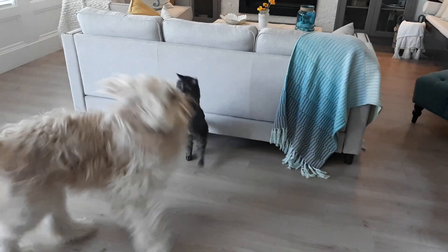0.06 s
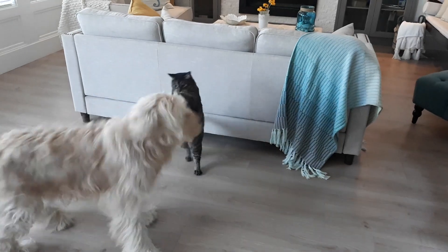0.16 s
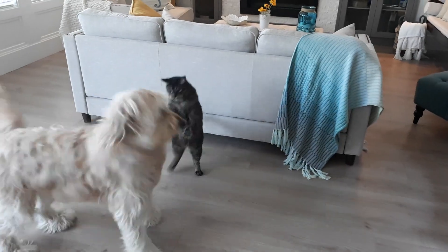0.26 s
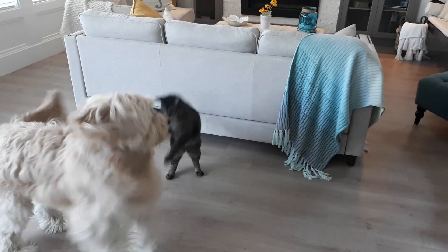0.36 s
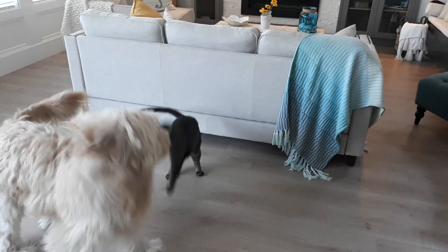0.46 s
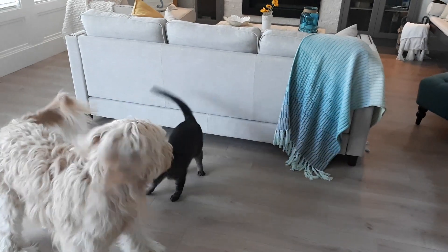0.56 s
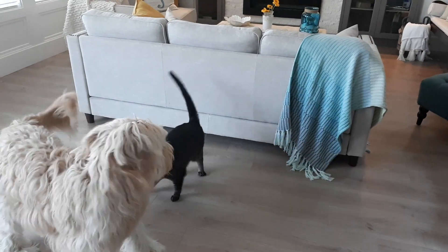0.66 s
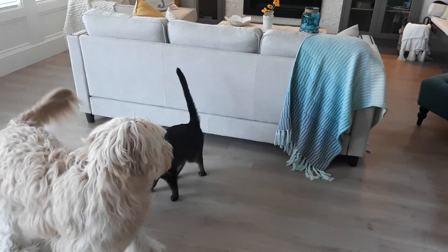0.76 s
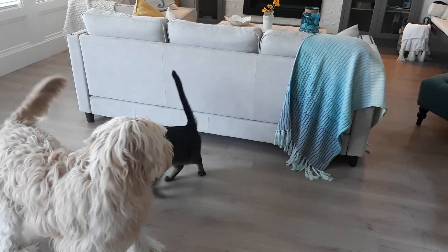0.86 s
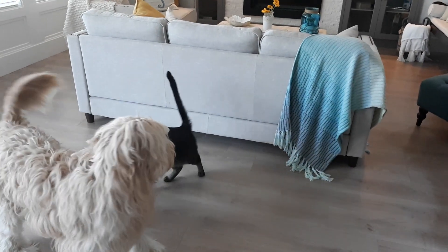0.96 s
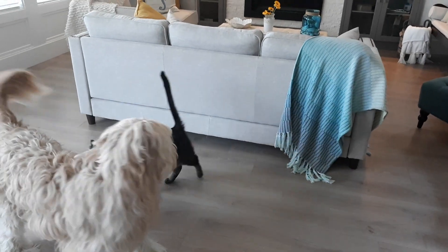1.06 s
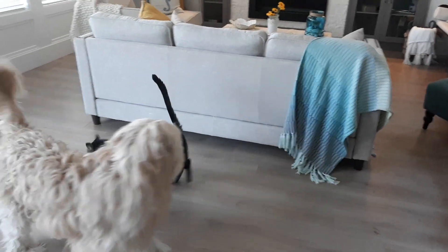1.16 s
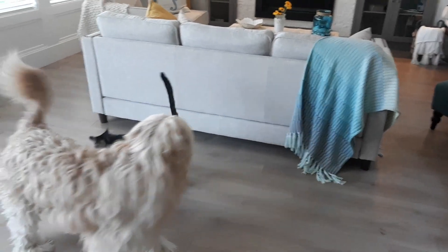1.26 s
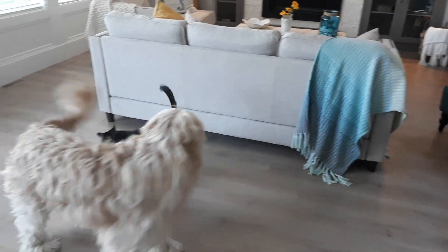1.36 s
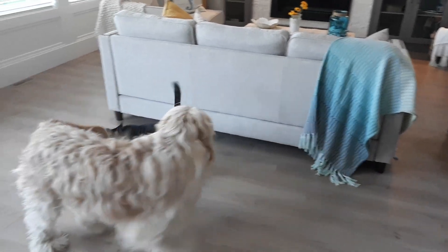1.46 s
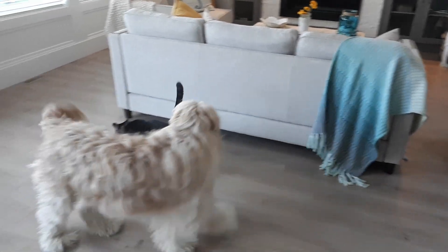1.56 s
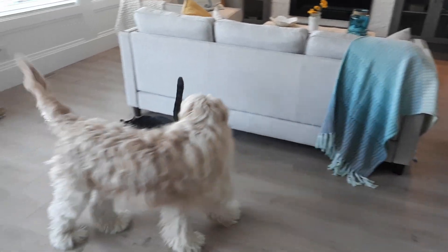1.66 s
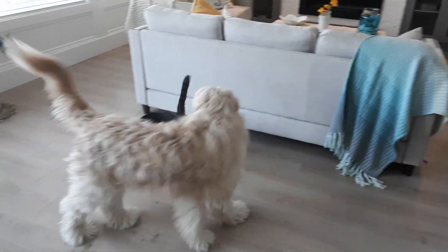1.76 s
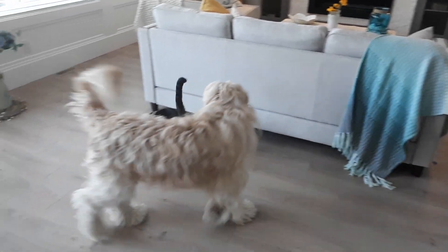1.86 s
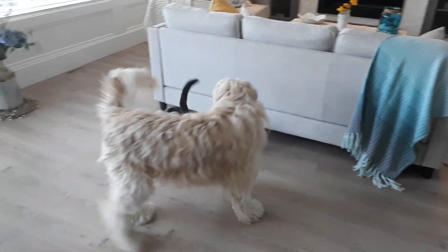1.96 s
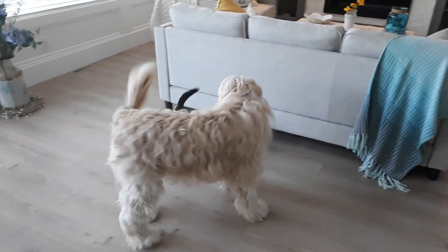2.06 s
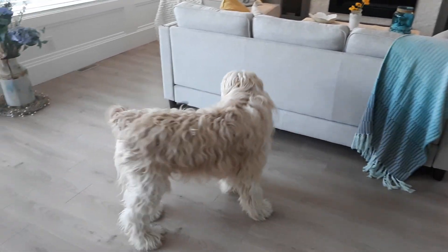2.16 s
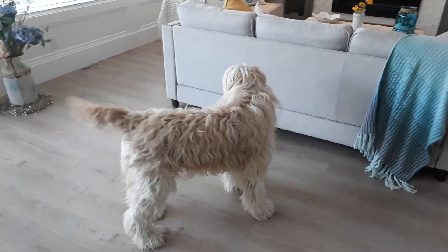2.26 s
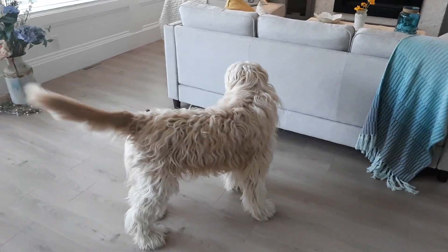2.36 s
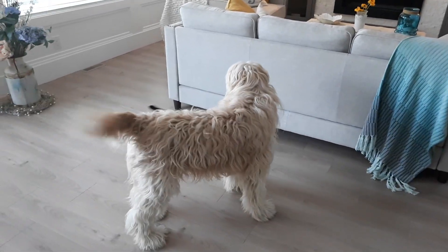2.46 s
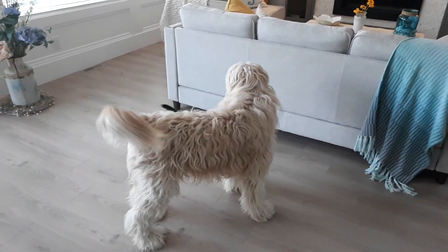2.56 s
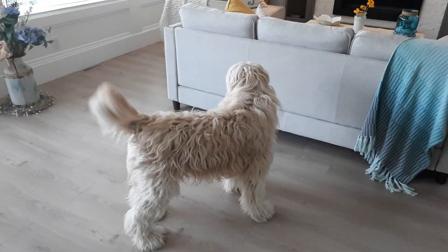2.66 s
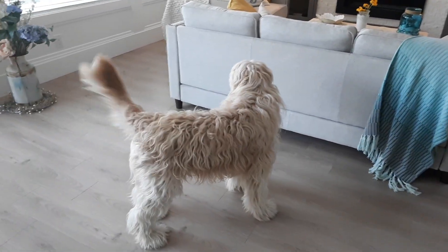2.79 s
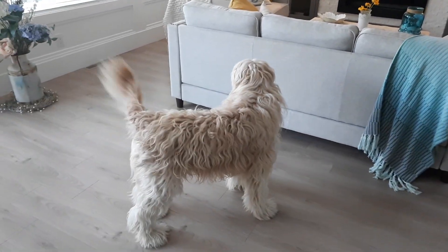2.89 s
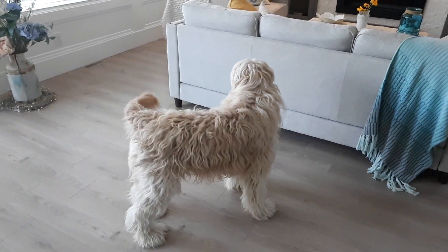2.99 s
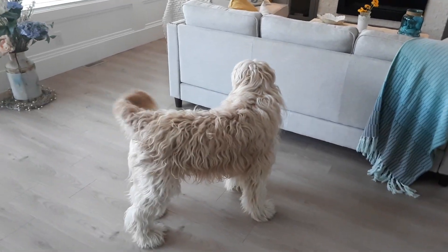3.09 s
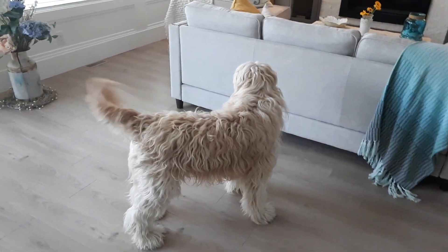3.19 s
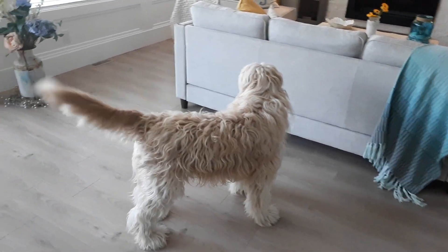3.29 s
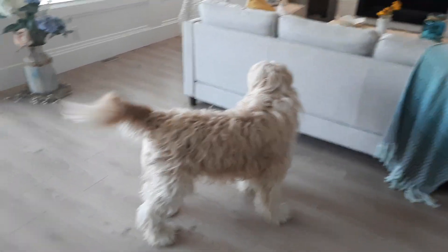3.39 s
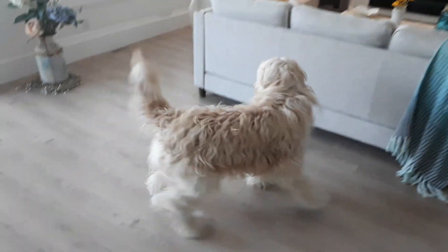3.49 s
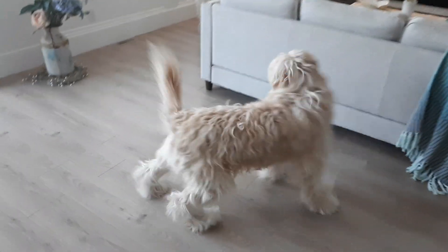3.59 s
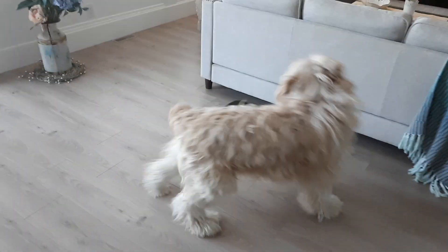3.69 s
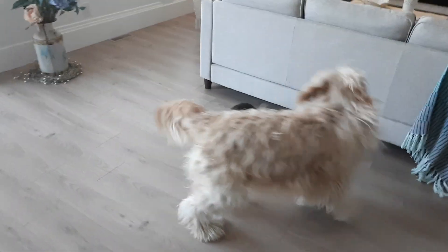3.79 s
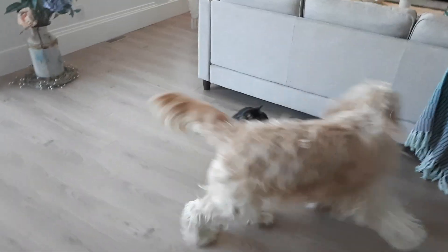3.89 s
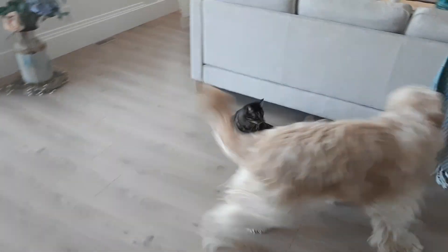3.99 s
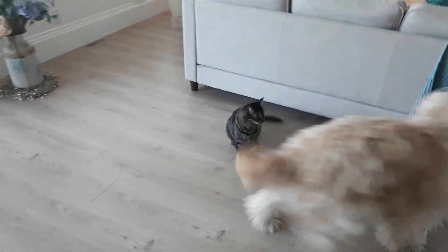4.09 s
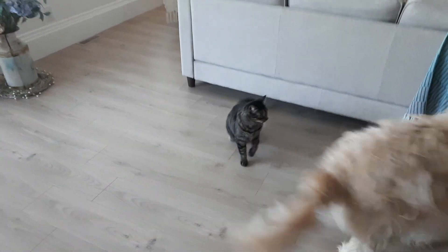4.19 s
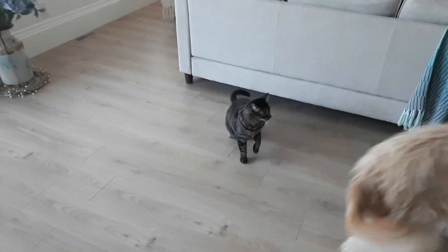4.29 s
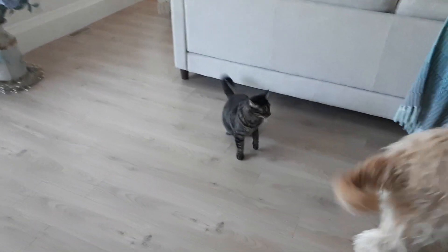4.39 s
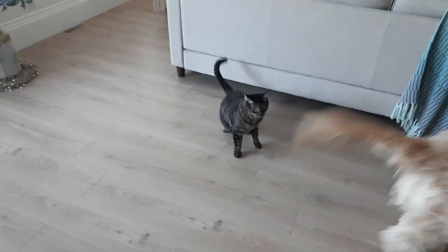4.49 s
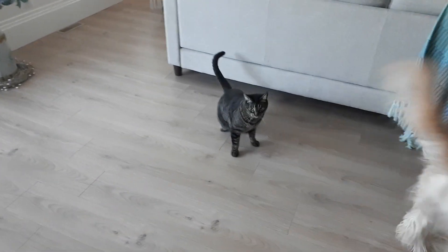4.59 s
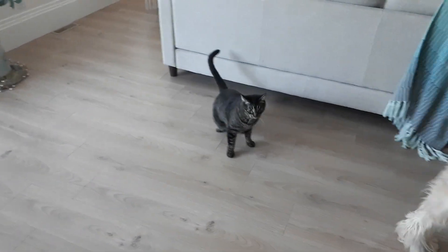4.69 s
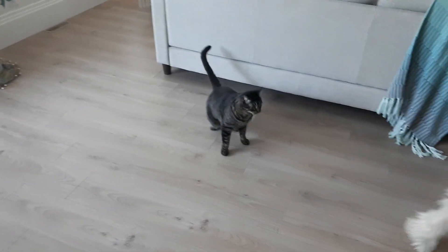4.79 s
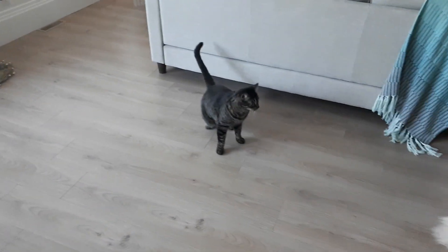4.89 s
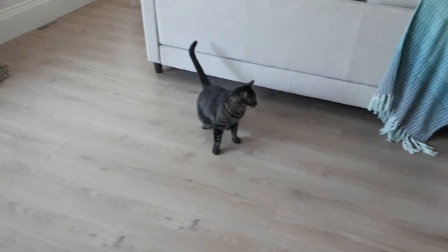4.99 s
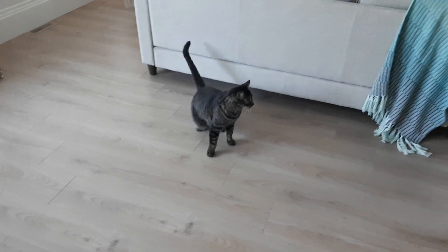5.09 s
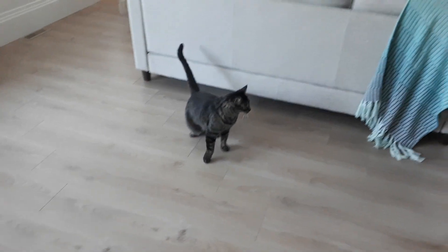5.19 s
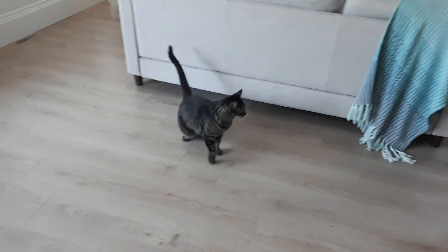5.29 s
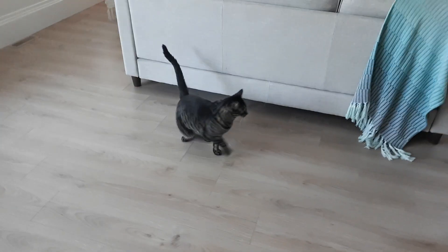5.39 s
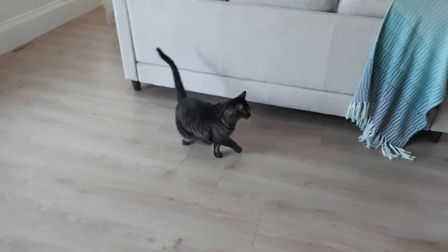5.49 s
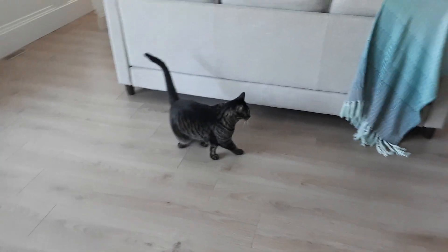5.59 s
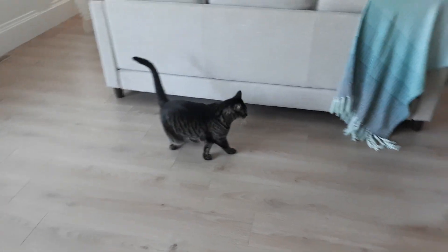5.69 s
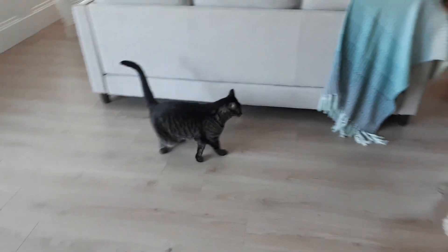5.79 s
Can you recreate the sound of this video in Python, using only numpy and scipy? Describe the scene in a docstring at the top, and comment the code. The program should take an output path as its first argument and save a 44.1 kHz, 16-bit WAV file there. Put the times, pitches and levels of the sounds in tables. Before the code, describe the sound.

Claws rattle in quick clusters on wooden boards with soft thuds underneath, and a faint high whine slips in early. Then near silence over low air noise, one small step and thump around two seconds. Later a grainy scrape starts a louder burst of clicks that moves right and fades to sparse taps. Lively room, microphones a metre or two away.

```python
"""A large dog pounces at a silent cat, stands, then scrambles off to the right on a plank floor in a live living room.
About a metre or two from the microphones, claws click one after another: ticks, chatter and ringing wood.
Pads and knocks push the boards into low thumps, paws skid as grainy noise, one thin whine sounds early on.
Sparse, thickening reflections follow, stronger for claws farther away, over air noise and a faint fan hum."""
import sys
import numpy as np
from scipy import signal
from scipy.fft import rfft, irfft
from scipy.io import wavfile
from scipy.ndimage import uniform_filter1d

SR = 44100
rng = np.random.default_rng(int(sys.argv[2]) if len(sys.argv) > 2 else 0)


def output_pcm(signal):
    """Save a mono or channel-first signal as 16-bit PCM at the path in sys.argv[1].

    Samples are clipped to [-1, 1] before scaling.
    """
    pcm = np.clip(np.atleast_2d(signal).T, -1, 1) * 32767
    wavfile.write(sys.argv[1], SR, np.round(pcm).astype(np.int16))


N = 257984  # length in samples

# sound straight from the claw tip to the microphones, relative to the plank: freq_hz, gain_db
CLAW_TIP_COLOUR = [(100, -3.5), (1200, 0.5), (2500, 2.5), (4500, -1), (8000, 0.5), (11000, 4),
                   (16000, -10.5)]


def claws(ring_db=-12, ring_ms=5, stray_db=-13, stray_ms=25, strays_per_s=250, spread=0.77, size=4096, count=5):
    """Each claw gives a sharp tick and a brief chatter; the plank rings and neighbouring claws graze it."""
    direct, spots = np.zeros((2, N)), np.zeros((count, N))
    hz = bins(size)
    ms = np.arange(size) / SR * 10 ** 3
    modes_db = plank_modes(len(PAW_LANDINGS), size)
    tick = 0.5 * evened(1.0 * (ms == 0))
    for k, (step, s, db, pitch_hz, chatter_ms, room_db, snap_db) in enumerate(claw_touches()):
        # the level is the rms of a click whose energy is packed into 1 ms
        height = amp(db) * np.sqrt(SR / 10 ** 3 / size)
        # the plank radiates differently towards each ear
        grit = rng.standard_normal((3, size))
        grit = grit[0] + spread * grit[1:]
        chatter = evened(grit * np.exp(-ms / chatter_ms))
        ring = amp(ring_db) * evened(grit[:, ::-1] * np.exp(-ms / ring_ms))
        grazes = rng.random(size) < strays_per_s / SR
        strays = amp(stray_db) * evened(grit * grazes * np.exp(-ms / stray_ms))
        force = tick + chatter + ring + strays

        colour_db = contact(hz, pitch_hz, snap_db - shade(s), lift_db=6.5, octaves=0.27) + modes_db[step]
        click = irfft(rfft(force) * causal(colour_db + read(CLAW_TIP_COLOUR, hz)))
        add(direct, s, placed(height * evened(click), s))

        echo_db = contact(hz, pitch_hz, snap_db, lift_db=3.5, octaves=0.54) + modes_db[step]
        add(spots[k % count], s, height * amp(room_db) * evened(irfft(causal(echo_db))))
    # successive claws land on different spots, each with its own reflections
    return direct, sum(room(spot) for spot in spots)


# a paw lands, claws first: start_s, claw_level_db, pitch_hz, snap_db (top octave), chatter_ms (decay),
# claws (how many touch), gap_ms (between touches)
PAW_LANDINGS = [(.001, -11.5, 5400, 1.5, 4, 2, 9.5), (0.1324, -18, 6760, 10, 2.4, 2, 4),
                (.174, -19, 6240, -7, 2.2, 1, 0), (0.338, -31.5, 4500, 0, 5.2, 1, 0),
                (0.4101, -17, 4870, 3.5, 1.3, 4, 5), (0.443, -23, 8200, 25, 0.36, 1, -3),
                (0.4672, -19.5, 5100, -14, 6.2, 1, 0), (1.682, -35.5, 3240, -12, 4.1, 1, 0),
                (2.046, -20.5, 6700, -0.5, 2.7, 2, 10), (3.6, -13, 5600, 3.5, 3.4, 1, -2),
                (3.7827, -14.5, 6540, -0.5, 0.13, 3, 6), (3.898, -16, 4540, 8.5, 1.7, 2, 5.5),
                (3.9625, -9, 6760, 12.5, 3.5, 1, 0), (3.9682, -13.5, 4400, -23, 5.5, 1, 3),
                (4.1917, -17, 5270, 12, 0.42, 1, 0), (4.2074, -15.5, 5750, 3.5, .8, 2, 8),
                (4.3549, -22, 7500, 9.5, .6, 2, 6), (4.4527, -16, 5060, 9, 0.48, 1, 0),
                (4.464, -37, 6460, 26, 0.44, 2, 9), (4.7129, -33.5, 5500, 5, 0.44, 1, -9.5),
                (4.7806, -34.5, 5050, -7.5, 1.4, 2, 10), (4.9136, -42, 4250, -8, 1.4, 2, 3.5),
                (5.1305, -40, 4580, -18.5, 2, 1, -3.5), (5.1493, -26.5, 4900, 2, 0.35, 1, -5.5),
                (5.503, -48, 4040, -16.5, 9, 1, 1), (5.6523, -27, 5600, 8, 2.7, 1, -14)]
# a claw's room send at 1 m; dragging, low-pitched contacts stir the room more
CLAW_ROOM_DB, CLAW_ROOM_DB_PER_MS = -6, 0.76
CLAW_ROOM_HZ, CLAW_ROOM_DB_PER_OCTAVE = 5600, -5.5
ROLL_DB = -1  # level of a paw's last claw relative to its first


def claw_touches():
    """The claws of a paw touch one after another: step, s, dB, pitch Hz, chatter ms, room send dB, snap dB."""
    for step, (s, db, pitch_hz, snap_db, chatter_ms, count, gap_ms) in enumerate(PAW_LANDINGS):
        _, metres = whereabouts(s)
        room_db = CLAW_ROOM_DB + 20 * np.log10(metres) + CLAW_ROOM_DB_PER_MS * chatter_ms
        room_db += CLAW_ROOM_DB_PER_OCTAVE * np.log2(pitch_hz / CLAW_ROOM_HZ)
        roll_db = np.linspace(0, ROLL_DB, round(count))
        for k, extra_db in enumerate(roll_db - roll_db.mean()):
            touch_s = s + k * gap_ms / 10 ** 3
            yield step, touch_s, db + extra_db, pitch_hz, chatter_ms, room_db, snap_db


# what a claw on a plank radiates: freq_hz, gain_db
PLANK_COLOUR = [(100, -22), (400, -15), (700, -15), (1150, -7), (1600, -6), (2600, 1), (4800, 2),
                (5600, -2), (7900, -1), (9300, -12), (12500, -15.5), (16000, -29)]


def contact(hz, centre_hz, snap_db, lift_db, octaves, snap_hz=9200):
    """The plank's spectrum in dB, lifted around the contact's pitch; a sharp tip adds top, a dull one loses it."""
    top = 1 - 1 / (1 + (hz / snap_hz) ** 10)
    return read(PLANK_COLOUR, hz) + lift_db * lifted(hz, centre_hz, octaves) + snap_db * top


def plank_modes(steps, size, depth_db=2.1, width_hz=130):
    """Every step lands on another plank, with its own peaks and dips: dB per step and frequency."""
    width_bins = round(width_hz * size / SR)
    bumps = rng.standard_normal((steps, size // 2 + 1))
    smooth = uniform_filter1d(uniform_filter1d(bumps, width_bins), width_bins)
    return depth_db * evened(smooth)


# the dog's place seen from the microphones: start_s, bearing (-1 left to 1 right), distance_m
DOG_PATH = [(0, -0.33, 1.46), (.45, -0.26, 1.23), (1.7, 0.48, 0.75), (2.05, -0.17, 1.39), (3.6, 0.029, 1.2),
            (4.25, 0.95, 1.06), (4.5, 0.93, 1.86), (5.7, 1, 1.64)]


def whereabouts(s):
    """The dog's bearing and distance at time s, moving evenly between the listed places, never under 0.5 m."""
    times, bearing, metres = np.transpose(DOG_PATH)
    return np.interp(s, times, bearing), max(np.interp(s, times, metres), 0.5)


SHADE_DB_PER_M, SHADE_FROM_M = 20, 1.3


def shade(s):
    """Top-octave loss in dB: farther off, the dog's own body hides its claws from the microphones."""
    _, metres = whereabouts(s)
    return SHADE_DB_PER_M * max(metres - SHADE_FROM_M, 0)


PAN_DB, LAG_MS = 3.5, 0.27  # at full right, the left side is this much weaker and later


def placed(pair, s):
    """Gives a sound the level difference and delay of the dog's bearing: the far side is weaker and later."""
    bearing, _ = whereabouts(s)
    pan_db, lag_ms = -PAN_DB * bearing, LAG_MS * bearing
    delay_s = np.maximum([[lag_ms], [-lag_ms]], 0) / 10 ** 3
    size = pair.shape[1]
    delayed = irfft(rfft(pair) * np.exp(-2j * np.pi * bins(size) * delay_s), size)
    return delayed * amp([[pan_db / 2], [-pan_db / 2]])


# how the floor under a pad booms into the room: freq_hz, gain_db
FLOOR_BOOM = [(30, -18.5), (70, -4.5), (130, -5), (200, 6), (320, -4), (450, -7), (650, -32.5),
              (1500, -45.5), (16000, -95)]
SWELL_CYCLES = 0.95  # a thump's envelope peaks after this many cycles of the board
# room send at the reference pitch; higher thumps carry better into the room
PAD_ROOM_DB, PAD_ROOM_HZ, PAD_ROOM_DB_PER_OCTAVE = -5, 220, 6.5


def pads(lift_db=6, octaves=0.68, size=8192):
    """A soft pad pushes the boards into a few low cycles; the whole floor booms into the room."""
    direct, send = np.zeros(N), np.zeros(N)
    t = np.arange(size) / SR
    for s, db, board_hz in board_pushes():
        u = t * board_hz / SWELL_CYCLES
        swell = u * np.exp(1 - u)
        thump = amp(db) * swell * np.sin(2 * np.pi * board_hz * t)
        add(direct, s, thump)

        room_db = PAD_ROOM_DB + PAD_ROOM_DB_PER_OCTAVE * np.log2(board_hz / PAD_ROOM_HZ)
        boom_db = read(FLOOR_BOOM, bins(size)) + lift_db * lifted(bins(size), board_hz, octaves)
        boom = irfft(causal(boom_db))
        add(send, s, amp(room_db) * thump.std() * evened(boom))
    # boards radiate little of the deepest push
    direct = signal.sosfilt(signal.butter(2, 45, "high", fs=SR, output="sos"), direct)
    return direct + room(send, gap_s=0.0047, build_s=0.0047)


# a pad comes down with the dog's weight on it: start_s, level_db (of the swell's peak), board_pitch_hz
PAD_FALLS = [(.012, -24.5, 255), (.067, -34.5, 227), (.138, -30.5, 214), (.199, -40, 82.5),
             (.413, -43.5, 407), (.559, -30, 206), (.583, -33, 255), (.613, -30.5, 185.8),
             (1.691, -49, 241.7), (2.094, -24, 145), (2.122, -34, 160), (2.548, -49, 68), (3.52, -56, 200),
             (3.621, -38.5, 194), (3.801, -43, 75), (3.806, -30.5, 243), (3.903, -38.5, 220),
             (3.936, -39.5, 92), (3.964, -35, 440), (3.984, -43, 131.5), (4.192, -35.5, 398),
             (4.205, -48, 86.4), (4.228, -40, 220), (4.274, -46, 60), (4.438, -44, 129), (5.14, -51.5, 240)]
KNOCK_S, KNOCK_DB, KNOCK_HZ = 0.003, -34, 287  # delay after the first claw, level relative to it, pitch


def board_pushes():
    """The heavy pad falls, then a light knock under every step, harder the more claws touch: s, dB, pitch Hz."""
    yield from PAD_FALLS
    for s, db, *_, count, _ in PAW_LANDINGS:
        yield s + KNOCK_S, db + KNOCK_DB + 20 * np.log10(round(count)), KNOCK_HZ


# a paw slides over the planks: start_s, end_s, level_db (rms), centre_hz, centre_lift_db
PAW_SLIDES = [(1.696, 1.823, -64, 3400, 21), (1.692, 1.866, -73, 2040, 23.5),
              (1.754, 2.072, -65, 7040, 19.5), (1.824, 2.072, -68, 4000, 29),
              (2.589, 2.652, -65.5, 5900, 17), (2.615, 2.676, -64, 3100, 6), (3.343, 3.422, -66.5, 2400, 6),
              (3.465, 3.492, -40, 6600, 8.5), (3.489, 3.58, -36, 8300, 13), (3.478, 3.603, -37, 3200, 12),
              (3.555, 3.613, -43, 1420, 13.5), (4.152, 4.181, -43.5, 3010, 9),
              (4.898, 5.012, -63, 2600, 21.5)]
SKID_GROWTH_DB, SKID_ROOM_DB = 2.5, -4  # rise over one stroke; room send
SKID_BRIGHT_DB, SKID_SNAP_PER_DB = -46.5, 0.97  # strokes louder than this gain top, softer ones lose it


def skids(grain_db=1.7, edge=0.45, soft_hz=7000):
    """Claws and fur drag in tiny uneven slips, brightest in mid-stroke where the paw is fastest."""
    direct, send = np.zeros((2, N)), np.zeros(N)
    for start, end, db, centre_hz, lift_db in PAW_SLIDES:
        size = max(round((end - start) * SR), 64)
        hz = bins(size)
        snap_db = SKID_SNAP_PER_DB * (db - SKID_BRIGHT_DB)
        slips = rng.standard_normal((3, size)) * amp(grain_db * rng.exponential(1, size))
        fast = rfft(slips) * amp(contact(hz, centre_hz, snap_db, lift_db, octaves=0.3))
        slow = fast / (1 + (hz / soft_hz) ** 6)
        speed = signal.windows.hann(size)
        hiss = speed * irfft(fast, size) + (1 - speed) * irfft(slow, size)
        stroke = amp(np.linspace(0, SKID_GROWTH_DB, size)) * signal.windows.tukey(size, edge)
        hiss = amp(db) * evened(hiss * stroke)
        add(direct, start, placed(hiss[:2], start))
        add(send, start, amp(SKID_ROOM_DB) * hiss[2])
    return direct, room(send)


# the partials that sound, with no fundamental among them: multiple, level_db (relative)
WHINE_PARTIALS = [(2, -24.5), (3, -14), (4, -32.5)]
# course of the whine: start_s, pitch_hz (of the absent fundamental), level_db (before the trim in the scene)
WHINE_COURSE = [(.15, 665, -55), (.2, 665, -48), (.23, 618, -46), (.275, 680, -47), (.32, 678, -51),
                (.355, 697, -43), (.39, 682, -45), (.43, 675, -44)]


def whine(jitter=0.006):
    """A thin, slightly unsteady tone of three harmonics, whose third partial stands out."""
    s, hz, db = np.transpose(WHINE_COURSE)
    t, out = np.arange(s[0], s[-1], 1 / SR), np.zeros(N)
    waver = 1 + jitter * evened(uniform_filter1d(rng.standard_normal(len(t)), 200))
    turns = np.cumsum(np.interp(t, s, hz) * waver) / SR
    tone = sum(amp(level) * np.sin(2 * np.pi * round(k) * turns) for k, level in WHINE_PARTIALS)
    level = amp(np.interp(t, s, db)) * signal.windows.tukey(len(t), 0.1)
    add(out, s[0], evened(tone) * level)
    return out


# colour of the living room's reflections: freq_hz, gain_db
ROOM_COLOUR = [(100, 8.5), (300, 3.5), (700, 7), (1500, 1), (2700, 4), (4500, -4), (6000, -4.5), (8000, -6),
               (10000, -6), (16000, -2.5)]
# time the reflections take to fall by 60 dB: freq_hz, decay_s
ROOM_DECAY = [(100, 0.59), (250, 0.46), (700, 0.77), (1800, 0.72), (4500, 0.62), (8000, 0.55),
              (13000, 0.35)]


def room(x, gap_s=0.001, build_s=0.008, first_taps_per_s=900, thicken_s=0.025, size=40960):
    """Reflections start sparse, thicken, and die at each band's own speed."""
    t = np.arange(size) / SR
    density = np.minimum(first_taps_per_s * (1 + (t / thicken_s) ** 2) / SR, 1)
    hits = rng.random((2, size)) < density
    taps = rng.choice([-1.0, 1.0], (2, size)) * hits / np.sqrt(density)
    hz, times, bands = signal.stft(irfft(diffuse(taps)), SR, nperseg=256)
    decay = amp(-60 * times / read(ROOM_DECAY, hz)[:, None])
    tail = signal.istft(bands * decay, SR, nperseg=256)[1][:, :size]
    tail *= 1 - np.exp(-np.maximum(t - gap_s, 0) / build_s)
    unit_energy = evened(tail) / np.sqrt(size)
    tail = irfft(rfft(unit_energy) * causal(read(ROOM_COLOUR, bins(size))))
    return signal.fftconvolve(x[None], tail, axes=1)[:, :N]


# how alike diffuse sound is at the two microphones: freq_hz, correlation (left to right)
MICROPHONE_LIKENESS = [(50, 0.95), (340, 0.9), (560, 0.18), (1000, 0.02), (2000, 0.075), (16000, 0.08)]


def diffuse(pair):
    """Spectra of two unrelated signals, made alike in the bass as at two close microphones."""
    a, b = rfft(pair)
    turn = np.arccos(np.clip(read(MICROPHONE_LIKENESS, bins(pair.shape[1])), -1, 1)) / 2
    return np.array([a * np.cos(turn) + b * np.sin(turn), a * np.cos(turn) - b * np.sin(turn)])


# spectrum of the room's air noise, shape only: freq_hz, density_db (per Hz, relative)
AIR_COLOUR = [(15, -63), (25, -29.5), (53, -1), (130, -3.5), (326, -12.5), (354, -16), (476, -16.5),
              (659, -20.5), (714, -16), (775, -16.5), (1160, -24), (1790, -26.5), (3340, -35), (13200, -38),
              (16000, -49.5)]
AIR_DB = -62.5  # rms level of the air noise
# duct resonances: centre_hz, width_hz (at half amplitude), level_db (rms)
DUCT_RESONANCES = [(727, 35, -79.5), (119, 25, -73.5)]


def ventilation(fan_hz=705, fan_db=-77, waver_hz=2.5):
    """Low air noise, two duct resonances, and the faint, slightly wavering tone of a fan."""
    hz = bins(N)
    hiss = diffuse(rng.standard_normal((2, N))) * amp(read(AIR_COLOUR, hz))
    air = amp(AIR_DB) * evened(irfft(hiss, N))
    drive = diffuse(rng.standard_normal((2, N)))
    duct = 0
    for centre_hz, width_hz, db in DUCT_RESONANCES:
        resonance = drive / (1 + ((hz - centre_hz) / width_hz * 2) ** 2)
        duct = duct + amp(db) * evened(irfft(resonance, N))
    speed_hz = fan_hz + waver_hz * evened(uniform_filter1d(rng.standard_normal(N), size=3000))
    fan = amp(fan_db) * evened(np.sin(2 * np.pi * np.cumsum(speed_hz) / SR))
    return air + duct + fan


def amp(db):
    """Decibels to amplitude."""
    return 10 ** (np.asarray(db) / 20)


def evened(x):
    """Scales to rms 1."""
    return x / np.sqrt(np.mean(x ** 2) + 1e-30)


def read(points, hz):
    """Reads a table on a log-frequency axis."""
    f, value = np.transpose(points)
    return np.interp(np.log(hz + 1), np.log(f + 1), value)


def bins(size):
    """Frequencies in Hz of a spectrum of that many samples."""
    return np.fft.rfftfreq(size, 1 / SR)


def lifted(hz, centre_hz, octaves):
    """A bell of height 1 around a pitch."""
    return np.exp(-0.5 * (np.log2((hz + 1) / centre_hz) / octaves) ** 2)


def causal(db):
    """The minimum-phase response with this gain curve: its energy comes as early as possible."""
    log_gain = irfft(np.log(amp(db)))
    fold = 1 + np.sign(len(log_gain) / 2 - np.arange(len(log_gain)))
    fold[0] = 1
    return np.exp(rfft(log_gain * fold))


def add(mix, s, sound):
    """Mixes a sound in at time s, cut off at the end of the mix."""
    part = mix[..., max(round(s * SR), 0):][..., :sound.shape[-1]]
    part += sound[..., :part.shape[-1]]


def scene(whine_db=-2, whine_room_db=-7, echo_pan_db=-1):
    """Direct sounds, their echo in the room, and the steady background."""
    clicks, click_echo = claws()
    slides, slide_echo = skids()
    voice = amp(whine_db) * whine()
    echo = click_echo + slide_echo + amp(whine_room_db) * room(voice)
    echo = echo * amp([[echo_pan_db / 2], [-echo_pan_db / 2]])
    return clicks + slides + pads() + voice + echo + ventilation()


EDGE_HZ = 16250


def record(dry):
    """The recorder's band limit: a steep low-pass."""
    low_pass = signal.firwin(401, EDGE_HZ, window=("kaiser", 9), fs=SR)
    return signal.oaconvolve(dry, low_pass[None], "same")


dry = scene()
out = record(dry)
output_pcm(out)
```